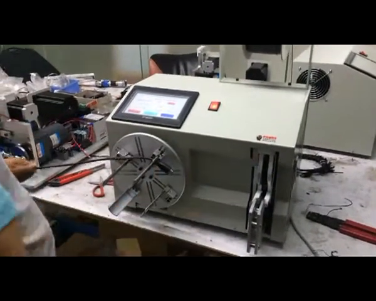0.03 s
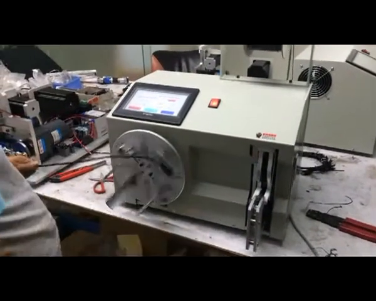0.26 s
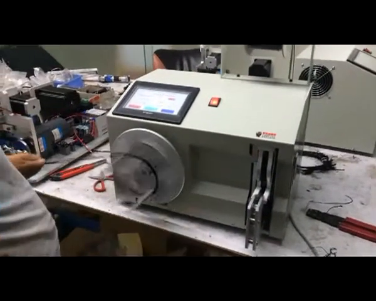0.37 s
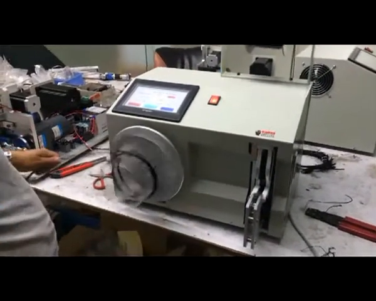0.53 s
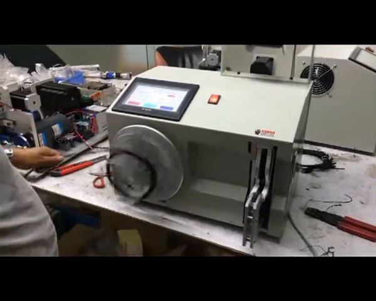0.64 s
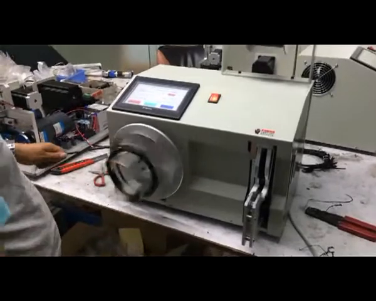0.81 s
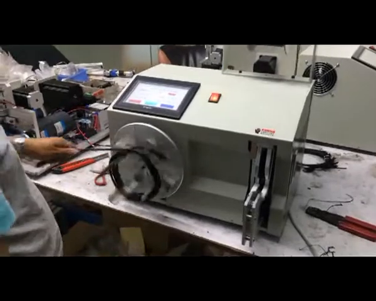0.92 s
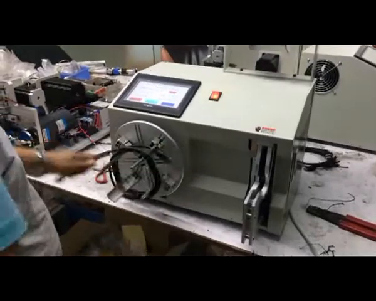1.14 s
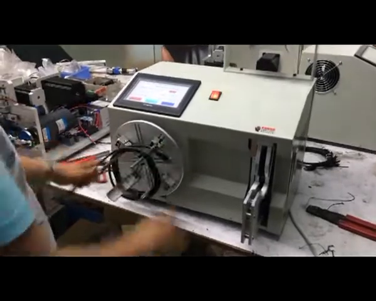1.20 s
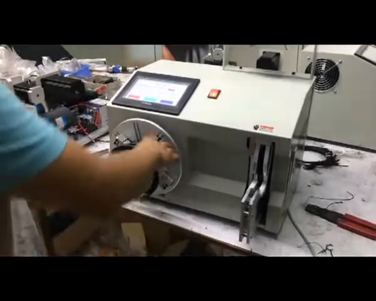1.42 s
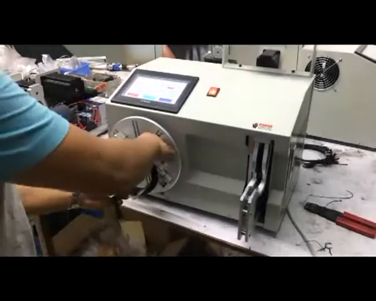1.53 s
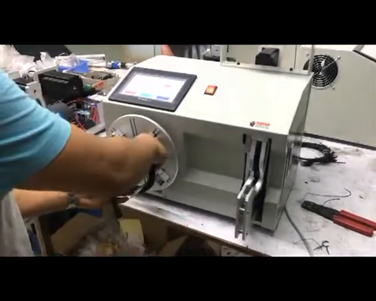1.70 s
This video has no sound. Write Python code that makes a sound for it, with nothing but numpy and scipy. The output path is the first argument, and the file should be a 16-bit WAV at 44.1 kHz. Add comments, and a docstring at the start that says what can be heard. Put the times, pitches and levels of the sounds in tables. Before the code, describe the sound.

A small machine's motor clicks on, whirs up, clunks and brakes to a stop.

```python
"""A bench wire-coiling machine runs one cycle in a humming workshop.
A switch clicks and the servo ramps up, growling, through the resonances of its steel cabinet;
the frame hums, the wire slaps and squeaks tight, and the switch clicks once more.
At full speed the motor whines while the coil rattles and rumbles round. The mechanism clunks
and rings the panels, the motor brakes to a stop, the wire settles and the room hums on."""
import sys
import numpy as np
from scipy import signal
from scipy.fft import rfft, irfft
from scipy.io import wavfile
from scipy.ndimage import uniform_filter1d

SR = 44100
rng = np.random.default_rng(int(sys.argv[2]) if len(sys.argv) > 2 else 0)


def pcm_store(signal):
    """Save signal as 16-bit PCM."""
    levels = np.round(np.clip(np.atleast_2d(signal), -1, 1) * 32767)
    wavfile.write(sys.argv[1], SR, levels.astype(np.int16).T)


N = 77175
T = np.arange(N) / SR


def amp(db):
    """Decibels to gain."""
    return 10 ** (np.asarray(db) / 20)


def unit(x):
    """Scales to rms 1."""
    return x / np.sqrt(np.mean(x ** 2) + 1e-20)


def read(points, hz):
    """Interpolates a table on a log-frequency axis."""
    f, value = np.transpose(points)
    return np.interp(np.log(hz + 1), np.log(f), value)


def envelope(points, outside_db=None):
    """Gain over time from rows of seconds and dB."""
    return amp(np.interp(T, *np.transpose(points), left=outside_db, right=outside_db))


def add(mix, start_s, sound):
    """Mixes a sound in at a time."""
    part = mix[round(start_s * SR):][:len(sound)]
    part += sound[:len(part)]


def noise(spectrum):
    """Coloured noise, rms 1."""
    gain = amp(read(spectrum, np.fft.rfftfreq(N, 1 / SR)))
    return unit(irfft(rfft(rng.standard_normal(N)) * gain, N))


def drift(hz):
    """Random motion up to a rate, rms 1."""
    rolloff = 1 + (np.fft.rfftfreq(N, 1 / SR) / hz) ** 4
    return unit(irfft(rfft(rng.standard_normal(N)) / rolloff, N))


def sine(angle):
    """Sine with a random starting phase."""
    return np.sin(angle + 2 * np.pi * rng.random())


def fade(t60_s, t=T):
    """Exponential decay."""
    return np.exp(-np.log(1000) * t / t60_s)


def ring(modes, rise_s):
    """Struck modes dying away."""
    tones = sum(amp(db) * fade(t60_s) * sine(2 * np.pi * hz * T) for hz, db, t60_s in modes)
    return (1 - np.exp(-T / rise_s)) * tones


def highpass(x, hz):
    """Second-order bass cut."""
    return signal.lfilter(*signal.butter(2, hz, "high", fs=SR), x)


# Workshop decay. Each row: frequency in Hz, t60 in seconds.
ROOM_DECAY = [(100, 1.28), (400, 1.12), (1200, 0.92), (3000, 0.6525), (8000, .5)]

def room(x, wet_db):
    """Adds a diffuse tail, each band dying at its own rate."""
    hz, t, bands = signal.stft(rng.standard_normal(SR), SR, nperseg=256)
    tail = signal.istft(bands * fade(read(ROOM_DECAY, hz)[:, None], t), SR, nperseg=256)[1]
    tail *= np.clip(np.arange(len(tail)) / SR / 0.0027, 0, 1) ** 2
    return x + amp(wet_db) * signal.fftconvolve(x, tail / np.linalg.norm(tail))[:N]


# Workshop hum. Each row: frequency in Hz, density in dB.
HUM_SPECTRUM = [(25, -33), (45, -6), (58, 4), (78, -2), (110, -5.5), (170, -2.5), (230, -11), (380, -10),
                (560, -18), (1030, -15), (1600, -19), (2300, -30.5), (4500, -33), (8000, -36.5),
                (10000, -56)]

def hum(level_db=-49.5):
    """Steady low noise of the workshop."""
    return amp(level_db) * noise(HUM_SPECTRUM)


# Coil rumble. Each row: frequency in Hz, density in dB.
RUMBLE_SPECTRUM = [(25, -18), (60, -26.5), (120, 1.5), (170, -9.5), (240, -5), (400, -21), (900, -45.5)]
# Its envelope. Each row: time in seconds, level in dB.
RUMBLE_ENVELOPE = [(.3, -72), (.44, -55), (.5, -35), (.55, -44.5), (.59, -38), (.65, -42), (.705, -35),
                   (.76, -34.5), (.85, -55), (1.0, -66)]

def rumble():
    """Air and shake from the turning coil."""
    return envelope(RUMBLE_ENVELOPE) * noise(RUMBLE_SPECTRUM)


# Gear and wire rattle. Each row: frequency in Hz, density in dB.
RATTLE_SPECTRUM = [(30, -44), (70, -32), (130, -3.5), (330, -1.5), (550, -6.5), (900, -14.5), (1350, -1),
                   (2200, -8.5), (3300, -7.5), (5000, -18), (7500, -19.5), (10000, -36.5)]
# Its envelope. Each row: time in seconds, level in dB.
RATTLE_ENVELOPE = [(.25, -63), (.275, -35), (.33, -41), (.37, -42.5), (.43, -37.5), (.5, -37), (.57, -39.5),
                   (.72, -44), (.8, -34.5), (.88, -42.5), (.98, -44), (1.02, -51.5), (1.2, -63.5)]

def rattle(coil_angle, throb_db=2, grain_db=3):
    """Grainy gear and wire noise throbs once per coil turn."""
    grains = noise(RATTLE_SPECTRUM) * amp(throb_db * np.sin(coil_angle) + grain_db * drift(250))
    return envelope(RATTLE_ENVELOPE) * unit(grains)


# Jolts of the drive. Each row: start in seconds, level in dB.
FRAME_JOLTS = [(.288, -18), (.982, -24)]
# Frame modes. Each row: frequency in Hz, level in dB, t60 in seconds.
FRAME_MODES = [(319, 0, .22), (399, -10, .2)]

def frame():
    """Starting and stopping twist the frame, which hums briefly."""
    out = np.zeros(N)
    for start_s, db in FRAME_JOLTS:
        add(out, start_s, amp(db) * ring(FRAME_MODES, rise_s=0.011))
    return room(out, wet_db=-13)


# Wire slaps. Each row: start in seconds, relative level in dB, t60 in seconds.
WIRE_SLAPS = [(0.275, -43, 0.014), (0.311, -29, 0.056), (0.4922, -25, 0.026), (0.517, -39, .015),
              (0.877, -29, 0.034), (1.081, -54.5, 0.2), (1.248, -58.5, 0.12), (1.42, -50, 0.02),
              (1.508, -55, .05), (1.642, -61, 0.29)]
# Their colour. Each row: frequency in Hz, density in dB.
SLAP_SPECTRUM = [(30, -27.5), (200, -32.5), (900, 7), (2000, 0), (2900, -3.5), (3250, -12.5), (3600, -1),
                 (4400, -8.5), (6600, -4.5), (10000, -25)]

def wire_slaps(rise_s=0.0027):
    """The wire scuffs against the reel and settles."""
    out = np.zeros(N)
    attack = 1 - np.exp(-T / rise_s)
    for start_s, db, t60_s in WIRE_SLAPS:
        add(out, start_s, 2 * amp(db) * noise(SLAP_SPECTRUM) * fade(t60_s) * attack)
    return room(out, wet_db=-3)


def wire_squeak(start_s=.307, length_s=.024, hz=3240, level_db=-27, wander=0.023):
    """The wire squeaks once as it pulls tight."""
    out = np.zeros(N)
    swell = np.sin(np.pi * np.minimum(T / length_s, 1))
    phase = 2 * np.pi * np.cumsum(hz * (1 + wander * drift(300))) / SR
    add(out, start_s, amp(level_db) * swell * np.sin(phase))
    return out


# Switch clicks. Each row: start in seconds, then knock, snap and tick levels in dB.
SWITCH_CLICKS = [(0.1839, -24.5, -37, -39), (0.2074, -23, -28.5, -34.5), (0.2306, -43.5, -10.5, -31.5),
                 (0.3969, -45, -11, -30.5)]
# Lever and spring modes. Each row: frequency in Hz, level in dB, t60 in seconds.
LEVER_MODES = [(617, -14, 0.054), (973, -3, 0.042), (1130, 4.5, 0.016), (1450, -8.5, .016)]
SPRING_MODES = [(3570, -13, 0.0094), (4850, -4.5, 0.01), (5178, 0, 0.0076), (5460, -8, 0.0047),
                (6330, -10.5, 0.0094), (7570, -13, .007), (8440, -23.5, 0.014)]
# Contact noise. Each row: frequency in Hz, density in dB.
TICK_SPECTRUM = [(80, -22), (300, -10), (1300, -5), (2300, -4.5), (4000, 2), (5500, -3), (7500, -14.5),
                 (10000, -32)]

def switch(rise_s=0.00035):
    """Each click is a dull knock of the lever, a snap of its spring and a tick of contact."""
    out = np.zeros(N)
    for start_s, knock_db, snap_db, tick_db in SWITCH_CLICKS:
        knock = amp(knock_db) * ring(LEVER_MODES, rise_s)
        snap = amp(snap_db) * ring(SPRING_MODES, rise_s)
        tick = amp(tick_db) * noise(TICK_SPECTRUM) * fade(t60_s=0.043)
        add(out, start_s, knock + snap + tick)
    return room(out, wet_db=-5)


# Impact and rebounds. Each row: start in seconds, relative level in dB, low-pass edge in Hz.
CLUNK_BLOWS = [(0.7424, 0, 9000), (.746, -3, 6000), (0.7491, 1.5, 2200), (.7528, -12, 1800),
               (.756, -2, 3500), (0.7662, -3.5, 2200)]
# Impact noise. Each row: frequency in Hz, density in dB.
CLUNK_SPECTRUM = [(30, -49), (70, -40), (110, -9.5), (180, 2.5), (400, 0.5), (560, -2.5), (950, -2),
                  (1330, 5.5), (2100, -2.5), (3600, -4.5), (5200, -4.5), (7500, -11), (10000, -29.5)]
# Panel modes. Each row: frequency in Hz, level in dB, t60 in seconds.
PANEL_MODES = [(186.3, -29, 0.58), (243.2, -24, 0.4), (298, -28, 0.57), (390, -21.5, .3),
               (1219, -23.5, 0.18), (1257, -27, 0.39), (1643, -25.5, 0.31), (1743.2, -52, 0.083),
               (2440, -35, 0.17), (3500, -21, 0.15), (4790, -32, 0.25)]

def clunk(blow_db=-12, shake_db=-20.5):
    """A hard stop rebounds several times, rings the panels and shakes the case."""
    blows, case = np.zeros(N), np.zeros(N)
    for start_s, db, edge_hz in CLUNK_BLOWS:
        burst = noise(CLUNK_SPECTRUM) * fade(t60_s=.036)
        blow = signal.lfilter(*signal.butter(1, edge_hz, fs=SR), burst)
        add(blows, start_s, amp(blow_db + db) * blow)
    panels = ring(PANEL_MODES, rise_s=0.0075)
    shake = amp(shake_db) * noise(CLUNK_SPECTRUM) * fade(t60_s=0.29)
    add(case, CLUNK_BLOWS[0][0], panels + shake)
    return room(blows, wet_db=-3.5) + case


# Growl lines. One entry per line: multiple of the shaft rate; level in dB.
RIPPLE_ORDERS = [26, 34, 48]
RIPPLE_DB = [-2, -2, -8]
# Grinding. Each row: frequency in Hz, density in dB.
GRIND_SPECTRUM = [(100, -19), (330, 0.5), (520, -12.5), (800, 4), (1200, -19.5), (1900, -11.5), (4000, -32),
                  (10000, -47)]
# Growl envelope. Each row: time in seconds, level in dB.
GROWL_ENVELOPE = [(.258, -42), (.264, -28.5), (.285, -27), (.305, -32), (.31, -23), (.333, -27),
                  (.38, -27.5), (.44, -64), (.53, -52), (.76, -72), (.86, -45), (.915, -34), (.926, -28),
                  (.96, -29.5), (.98, -40), (1.01, -34), (1.025, -70)]

def growl(shaft_angle, edge_hz=937, grind_db=-5):
    """The drive growls and grinds at low speed under full torque."""
    ripple = sum(amp(db) * sine(order * shaft_angle) for order, db in zip(RIPPLE_ORDERS, RIPPLE_DB))
    ripple = signal.sosfilt(signal.butter(6, edge_hz, fs=SR, output="sos"), ripple)
    grind = amp(grind_db) * noise(GRIND_SPECTRUM)
    return envelope(GROWL_ENVELOPE, outside_db=-120) * (ripple + grind)


START_S, FULL_S, BRAKE_S, STOP_S = .258, .512, .757, 1.022
# Whine lines. One entry per line: multiple of the shaft rate; dB at full speed; dB on the ramps.
WHINE_ORDERS = [3, 4, 8, 12, 16, 17, 19, 20, 24, 28, 32, 36]
WHINE_CRUISE_DB = [-53.5, -61, -59, -73, -31.5, -43.5, -58, -53.5, -64.5, -43, -59, -47]
WHINE_RAMP_DB = [-67, -43.5, -48.5, -50.5, -31, -34.5, -45, -54.5, -53.5, -63.5, -56, -46]
# Gain on all lines. Each row: share of full speed, gain in dB.
WHINE_BY_SPEED = [(.2, -24), (.5, -6.5), (.7, -4), (1, 3)]

def whine(speed, torque, shaft_angle, coil_angle, flutter_db_per_order=.11, rough_db=1.5):
    """Shaft orders grow with speed and flutter once per coil turn, the higher ones more."""
    lines = np.zeros(N)
    for order, cruise_db, ramp_db in zip(WHINE_ORDERS, WHINE_CRUISE_DB, WHINE_RAMP_DB):
        line_db = cruise_db + (ramp_db - cruise_db) * torque
        flutter_db = flutter_db_per_order * order * sine(coil_angle)
        lines += amp(line_db + flutter_db + rough_db * drift(hz=90)) * sine(order * shaft_angle)
    take_up_s, let_go_s = .03, 0.0145
    gate = np.clip((T - START_S) / take_up_s, 0, 1) * np.clip((STOP_S - T) / let_go_s, 0, 1)
    return gate * amp(np.interp(speed, *np.transpose(WHINE_BY_SPEED))) * lines


TOP_HZ, GEAR_RATIO = 100.0, 4.0
# Steel cabinet resonances. Each row: centre in Hz, width in Hz, gain in dB.
CABINET_MODES = [(314, 12, 9), (392, 27, 6), (630, 40, -6), (786, 53, 2.5), (856, 89, 2.5),
                 (1155, 25, -11.5), (1975, 62, 1), (3200, 55, -3.5)]

def motor(speed, coil_angle, wobble=.0062, jitter=0.0143):
    """The servo's whine and growl sweep through the cabinet's resonances."""
    torque = uniform_filter1d(1. * (speed < 1), size=1300)  # 1 on the ramps, 0 at full speed
    shaft_hz = TOP_HZ * speed * (1 + wobble * np.sin(coil_angle) + jitter * torque * drift(80))
    shaft_angle = 2 * np.pi * np.cumsum(shaft_hz) / SR
    drive = highpass(whine(speed, torque, shaft_angle, coil_angle) + growl(shaft_angle), hz=328)
    cabinet = sum(amp(db) * signal.lfilter(*signal.iirpeak(hz, hz / width_hz, SR), drive)
                  for hz, width_hz, db in CABINET_MODES)
    return room(drive + cabinet, wet_db=-13)


def scene():
    """One speed curve drives motor and coil; the other sounds keep their own times."""
    speed = np.interp(T, [START_S, FULL_S, BRAKE_S, STOP_S], [0, 1, 1, 0])
    coil_angle = 2 * np.pi * np.cumsum(speed) * TOP_HZ / GEAR_RATIO / SR
    machine = motor(speed, coil_angle) + frame() + switch() + clunk() + wire_slaps() + wire_squeak()
    machine = highpass(machine, hz=110)  # the small case radiates little bass
    coil = room(rattle(coil_angle) + rumble(), wet_db=-7)
    return (machine + coil + hum())[None]


def record(dry):
    """The microphone's bass cut, then a steep treble limit."""
    lowpass = signal.firwin(511, 9800, window=("kaiser", 9), fs=SR)
    return signal.oaconvolve(highpass(dry, hz=60), lowpass[None], "same")


dry = scene()
out = record(dry)
pcm_store(out)
```